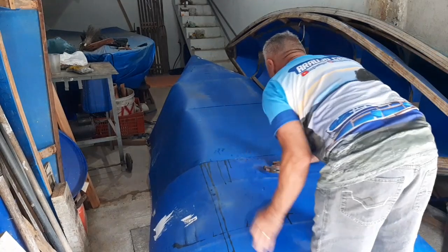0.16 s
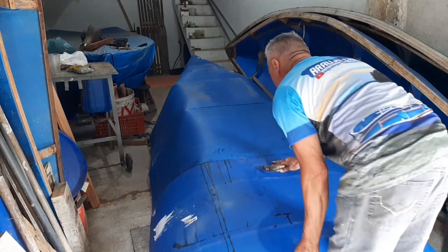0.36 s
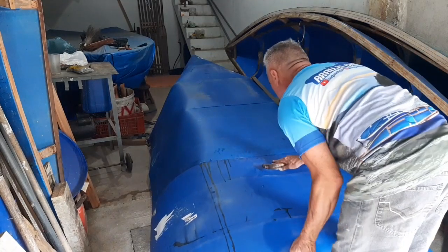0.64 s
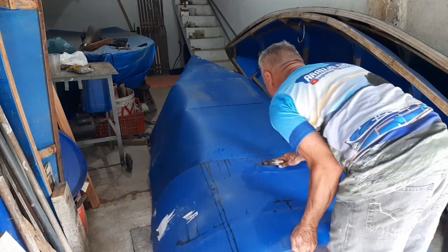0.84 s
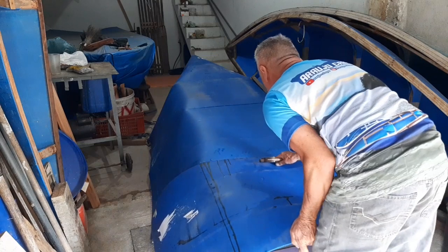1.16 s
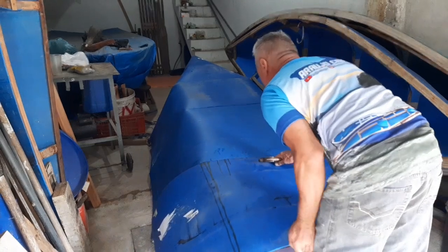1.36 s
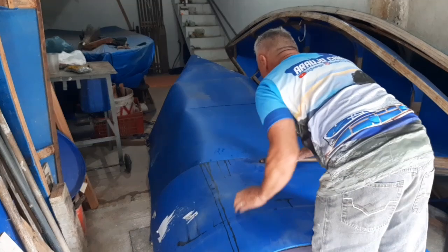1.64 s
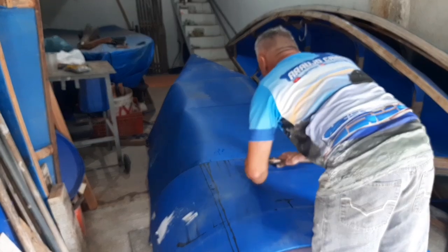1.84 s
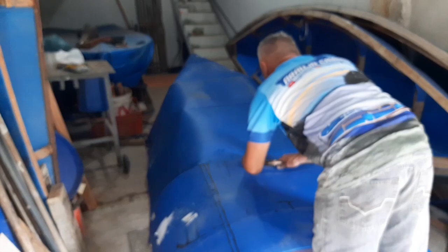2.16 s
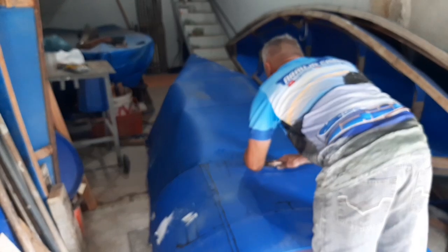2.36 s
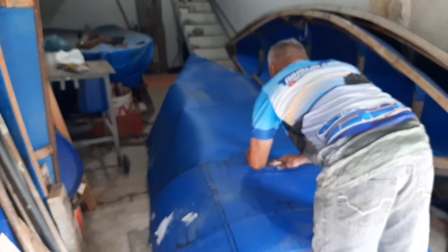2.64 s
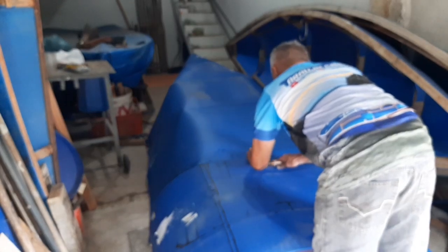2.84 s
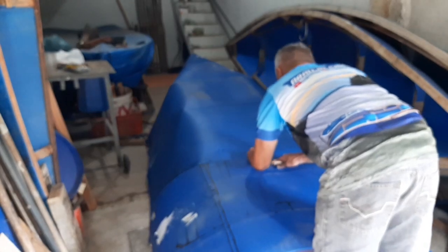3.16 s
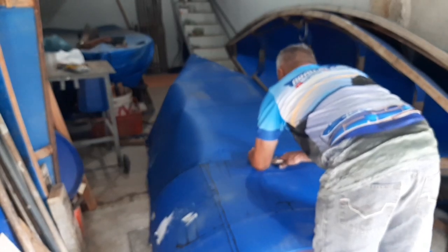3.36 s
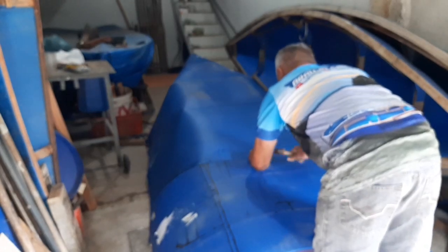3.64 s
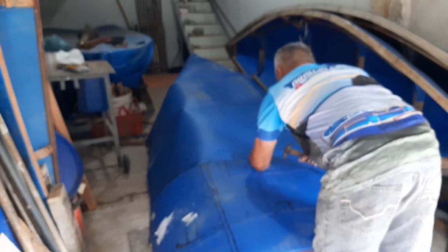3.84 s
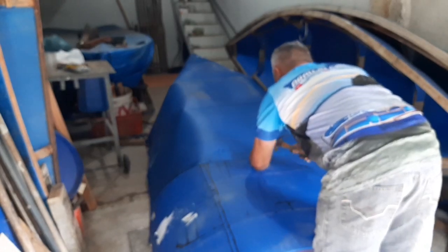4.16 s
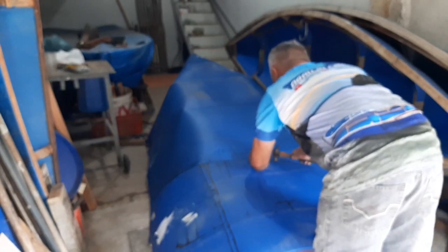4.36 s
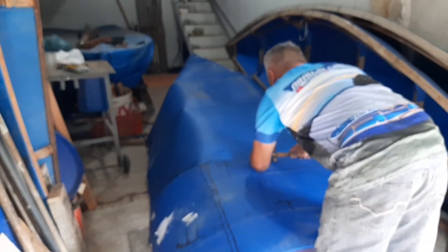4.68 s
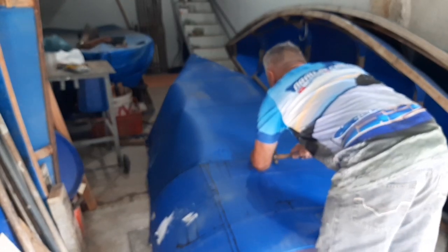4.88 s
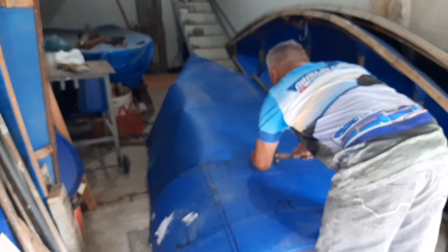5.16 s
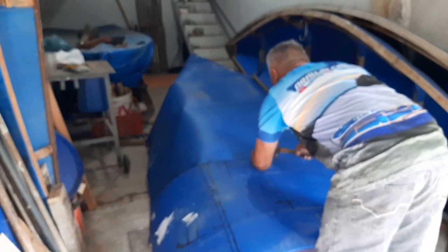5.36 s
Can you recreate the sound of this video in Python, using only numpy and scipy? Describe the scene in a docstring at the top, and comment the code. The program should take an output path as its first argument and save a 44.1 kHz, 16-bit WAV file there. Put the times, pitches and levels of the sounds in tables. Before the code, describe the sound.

Scuffs and light taps on a hollow, plastic-covered boat hull lead to three hard hammer blows, with faint birds and a distant rooster.

```python
"""Nailing plastic sheet to a boat

In a hard-walled workshop a man's hand and hammer slide and judder over an upturned wooden hull.
He taps a nail through the sheet into the frame, then strikes it three times. Each blow cracks at the
nail, rattles the sheet and booms in the hollow hull. Birds and a far rooster drift in over a low hum."""
import sys
import numpy as np
from scipy import signal
from scipy.fft import rfft, irfft, next_fast_len
from scipy.io import wavfile
from scipy.ndimage import uniform_filter1d

SR = 44100
rng = np.random.default_rng(int(sys.argv[2]) if len(sys.argv) > 2 else 0)


def master(y):
    """Save y as 16-bit WAV."""
    cut = np.clip(np.atleast_2d(y).T, -1, 1)
    pcm = np.round(cut * 32767)  # scale
    wavfile.write(sys.argv[1], SR, pcm.astype(np.int16))


N = 242991
TIME = np.arange(N) / SR
TAIL = TIME[:SR]  # one second for things to ring out
SEAT_S = .0019  # the nail bites this long after the steel touches it

# The stereo image. Each row: frequency in Hz, left-right correlation of diffuse sound,
# left minus right level in dB.
STEREO_IMAGE = [(61.1, .9, 5), (128.3, 0, 5), (269, 0.92, 3), (597, 0.7, 3), (1100, -.1, 1.4),
                (4000, 0.1, 2.5), (7930, 0.02, 2), (15600, 0.04, -2.5)]
# Tone of the background hum. Each row: frequency in Hz, relative level in dB.
HUM_TONE = [(18, -33.5), (30, -1), (93, -2), (233, -11.5), (437, -6), (740, -11.5), (937, -17.5),
            (1810, -20), (2060, -15.5), (3490, -23), (5740, -20), (14400, -32.5), (16000, -27)]
# Bird notes. Each row: start in seconds, length in seconds, opening pitch in Hz, closing pitch in Hz,
# relative level in dB, hoarseness as a share of the pitch.
BIRD_NOTES = [(1.268, 0.074, 2860, 2230, -72, 0.019), (1.336, 0.056, 2290, 2160, -65, 0.014),
              (1.536, 0.04, 2217, 2970, -67, 0.043), (1.597, 0.036, 5060, 3380, -58.5, 0.08),
              (1.857, 0.11, 2070, 1990, -72.5, 0.0046), (2.263, 0.16, 3310, 2280, -71.5, 0.019),
              (2.341, 0.242, 2318, 2240, -69.5, 0.0085), (2.507, 0.025, 6340, 6150, -64, .02),
              (2.867, 0.072, 2760, 2500, -58.5, 0.062), (3.045, .75, 4940, 4540, -66, 0.067),
              (3.079, 0.78, 3410, 3300, -65, 0.062), (3.779, 0.54, 2955, 2835, -71, 0.14),
              (4.049, 0.11, 3710, 3910, -65, 0.079), (4.1, 0.034, 4600, 3685, -57, 0.12)]
# Two rooster calls. Each row: start in seconds, length in seconds, top pitch in Hz, relative level in dB.
ROOSTER_CALLS = [(2.14, 0.523, 572.3, -63), (2.774, 0.97, 572.4, -58)]
# The rooster's timbre. Each row: harmonic number, relative level in dB.
ROOSTER_HARMONICS = [(1, -1.5), (2, -12), (3, -12.5), (4, -18.5)]
# Hand and sleeve sweeping the sheet. Each row: start in seconds, length in seconds, then mid-stroke
# hiss, sizzle and hull drag in dB, and the swell from start to end in dB.
HAND_STROKES = [(-.02, 0.04, -50, -59, -37.5, -2.5), (0.045, 0.056, -43.5, -54.5, -83, -9),
                (0.168, 0.15, -64.5, -68, -52, 6.5), (0.301, 0.26, -55, -64, -32, 0),
                (0.499, .155, -41, -51.5, -42, 8), (0.74, 0.042, -42.5, -47, -37, -2),
                (0.954, 0.092, -46, -57, -56, 8), (1.127, 0.091, -69, -75, -35, 7),
                (1.257, .07, -69, -67.5, -54, 3), (1.723, 0.046, -45.5, -52.5, -51, -7),
                (1.778, 0.13, -60, -56.5, -63, 3), (2.154, .26, -75, -77, -67, 5),
                (2.779, 0.21, -63.5, -87.5, -52.5, -6), (3.222, 0.017, -59, -63, -45.5, 3),
                (4.326, 0.067, -54, -68, -38.5, 6), (4.47, 0.12, -63.5, -72, -79, -1)]
# Tone of the rubbed plastic. Each row: frequency in Hz, relative level in dB.
HISS_TONE = [(410, -18.5), (700, -3.5), (1180, -7.5), (1350, -5), (2430, -4.5), (4060, -9), (6270, -12),
             (7570, -10.5), (10000, -29), (13000, -40), (22000, -120)]
# The hull's resonances. Each row: pitch in Hz, relative level in dB, 60 dB decay in seconds
# before the plastic shortens it.
HULL_MODES = [(65, -30.5, 1), (73.4, -34.5, 0.48), (85.67, -23, 0.96), (100.48, -21, 0.86), (102.3, -23, 1),
              (117.56, -14, 0.49), (128.9, -28, .5), (146.5, -24, 0.84), (154.5, -23.5, 0.39),
              (172.9, -23, 0.66), (206.2, -33.5, 0.55), (224.3, -21, 0.48), (272.8, -21, 0.37),
              (293.4, -26.5, 0.12), (318, -16.5, 0.17), (307, -21, 0.061), (353.7, -21, 0.48),
              (386, -24.5, 0.39), (412.2, -19.5, 0.24), (437.6, -19, 0.15), (450.4, -34, 0.62),
              (488.2, -22, 0.34), (500, -27, 0.19), (599, -34, 0.15), (634, -33.5, 0.16), (673, -32, 0.57),
              (731.7, -25.5, 0.23), (804, -28, 0.9)]
# Dense wash of hull and room. Each row: frequency in Hz, relative level in dB, 60 dB decay in seconds.
HULL_WASH = [(30.26, -11.5, 0.4), (90, -29, 0.56), (199, -5.5, 0.69), (396.7, -4, 0.49), (560, -6, 0.29),
             (1090, -13.5, 0.28), (2060, -23.5, 0.28), (5125, -25, 0.1), (16000, -49, .3)]
# Ring of nail and hammer head. Each row: pitch in Hz, relative level in dB, 60 dB decay in seconds.
STEEL_MODES = [(985, -34.5, .2), (1227, -39, .2), (3150, -34, 0.098), (4470, -36, .12), (7080, -38, 0.081)]
# Tone of steel cracking on nail and sheet. Each row: frequency in Hz, relative level in dB.
CRACK_TONE = [(100, -19.5), (500, 2), (1000, 12), (1550, 11.5), (2000, -7), (2600, -4.5), (3500, -2.5),
              (5400, -4.5), (7200, -1), (9000, -14), (12000, -3), (15500, -3)]
# Workshop tail of a crack. Each row: frequency in Hz, relative level in dB, 60 dB decay in seconds.
WALL_REVERB = [(100, -16, .5), (502, -6.5, 1), (1005, 3.5, 0.58), (1600, 3.5, 0.54), (2500, -1, 0.49),
               (4560, -4.5, 0.36), (7100, -9.5, 0.43), (9720, -15.5, 0.32), (13000, -10.5, 0.35),
               (15440, -29, 0.23)]
# The hammer head sticking and slipping on the sheet. Each row: start in seconds, push in dB,
# bass cut in Hz, knock pitch in Hz, knock level in dB.
HAMMER_SLIPS = [(0.691, -6.5, 188, 260, -17.5), (.718, 0, 235, 341, -12), (.745, 5, 343, 423, -16),
                (.780, 3, 300, 360.6, -13), (.789, -6.5, 297, 332, -1), (.821, 1.5, 171.5, 397, -7),
                (.847, -2.5, 110.1, 415, -3)]
# Hammer contacts, from grazes to full hits. Each row: start in seconds, push in dB, bass cut in Hz
# (high over a stiff rib), treble cut in Hz (low for a soft touch), crack level in dB,
# knock pitch in Hz, knock level in dB.
HAMMER_BLOWS = [(0.062, -45, 94, 880, -34, 900, -65), (0.106, -70, 86, 870, -27.5, 1080, -68),
                (0.319, -13, 59.4, 133, -39, 172, -31.5), (0.365, -18, 205, 455, -18, 387, -38),
                (0.517, -18, 90.5, 694, -20.5, 690, -33), (0.756, 2.5, 203, 494, -3.5, 370, -10.5),
                (1.0739, -4, 89.6, 590, -17, 782, -12.5), (1.728, -29, 112.7, 1555, -22.5, 825, -45),
                (2.8546, -49, 200, 1820, -26.5, 1570, -56), (2.967, -17, 92, 990, -9.5, 189.8, -27),
                (3.3731, -11.5, 185, 3180, 0.5, 1000, -17), (3.679, -40, 502, 499, -39.5, 830, -46.5),
                (4.314, -17.5, 81, 890, -18, 662, -31.5), (4.411, -17.5, 142, 750, -13, 318, -25.5),
                (4.7078, -1.5, 61.4, 3250, -1.5, 314.6, -11), (4.919, 0, 64.5, 3140, 0, 317, -5.5),
                (5.1253, -1, 59.5, 2900, -1, 321, -10.5)]


def undb(db):
    """Decibels to gain."""
    return 10 ** (np.asarray(db) / 20)


def unit(x):
    """Scale to rms 1."""
    return x / np.sqrt(np.mean(x ** 2))


def fade(t60):
    """Exponential decay, 60 dB down after t60 seconds."""
    return np.exp(-np.log(1000) * TAIL / t60)


def add(track, start_s, x):
    """Drop x onto the track at start_s."""
    start = max(int(start_s * SR), 0)
    track[start:start + len(x)] += x[:N - start]


def over_hz(rows, hz, column=1):
    """Read one column of a table on a log-frequency axis."""
    rows = np.array(rows)
    return np.interp(np.log(hz + 1e-9), np.log(rows[:, 0]), rows[:, column])


def shape(x, gain):
    """Filter by a gain that is a function of frequency."""
    size = next_fast_len(x.shape[-1] + SR // 10, True)
    hz = np.arange(size // 2 + 1) * SR / size
    return irfft(rfft(x, size) * gain(hz), size)[..., :x.shape[-1]]


def equalise(x, tone):
    """EQ through (Hz, dB) points."""
    return shape(x, lambda hz: undb(over_hz(tone, hz)))


def cut(x, hz, kind, order=2):
    """Low-pass or high-pass."""
    return signal.sosfilt(signal.butter(order, min(hz, SR / 2 - 1), kind, fs=SR, output="sos"), x)


def wobble(rate_hz):
    """Smooth random modulation of rms 1."""
    hold = max(int(SR / rate_hz), 1)
    steps = np.repeat(rng.standard_normal(N // hold + 1), hold)
    return unit(uniform_filter1d(steps, hold)[:N])


def diffuse(size):
    """Noise from all sides: mostly narrow in the lows, wide in the treble."""
    mid, side = rng.standard_normal((2, size))
    mid = shape(mid, lambda hz: np.sqrt((1 + over_hz(STEREO_IMAGE, hz)) / 2))
    side = shape(side, lambda hz: np.sqrt((1 - over_hz(STEREO_IMAGE, hz)) / 2))
    return np.array([mid + side, mid - side])


def direct(x, right_lag_s=.0004):
    """Sound straight from the hull arrives on the left first."""
    return np.array([x, np.pad(x, (round(right_lag_s * SR), 0))[:len(x)]])


def reverb(rows):
    """A diffuse tail of energy 1 whose third-octave bands die at their own rates."""
    spectrum, hz = rfft(diffuse(SR)), np.arange(SR // 2 + 1) + 1e-9
    tail = 0
    for centre in 1000 * 2 ** (np.arange(-14, 13) / 3):
        offset = np.clip(3 * np.log2(hz / centre), -1, 1)
        band = irfft(spectrum * np.cos(np.pi / 2 * offset) ** 2)
        t60 = over_hz(rows, centre, column=2)
        tail = tail + unit(band * fade(t60)) * np.sqrt(centre * t60) * undb(over_hz(rows, centre))
    return unit(tail) / np.sqrt(SR)


def excite(x, response):
    """Play a mono signal through a stereo impulse response."""
    return signal.fftconvolve(x[None], response, axes=1)[:, :N]


def neighbourhood_hum(level_db=-63.5, swell_db=1, bass_cut_hz=40):
    """The bed: quiet, dark noise from the neighbourhood, slowly breathing."""
    hum = cut(equalise(diffuse(N), HUM_TONE), bass_cut_hz, "high")
    return unit(hum) * undb(level_db + swell_db * wobble(2))


def birds():
    """Gliding sines; a fast pitch jitter turns pure whistles into hoarse chirps and buzzes."""
    calls = np.zeros(N)
    waver = wobble(900)
    for start, length, start_hz, end_hz, db, hoarse in BIRD_NOTES:
        progress = np.linspace(0, 1, int(length * SR))
        jitter = np.roll(waver, -int(start * SR))[:len(progress)]
        hz = start_hz * (end_hz / start_hz) ** progress * (1 + hoarse * jitter)
        envelope = 2 * np.sin(np.pi * progress)
        add(calls, start, undb(db) * envelope * np.sin(2 * np.pi * np.cumsum(hz) / SR))
    return calls


def rooster(rasp=0.043, sag=0.049, attack_s=.06, release_s=0.26):
    """Long hoarse notes on a shallow arch of pitch that sags at both ends."""
    calls = np.zeros(N)
    for start, length, pitch_hz, db in ROOSTER_CALLS:
        age = TIME[:int(length * SR)]
        arch = 1 - sag * (2 * age / length - 1) ** 2
        hz = pitch_hz * arch * (1 + rasp * wobble(120)[:len(age)])
        phase = 2 * np.pi * np.cumsum(hz) / SR
        voice = unit(sum(undb(level) * np.sin(k * phase) for k, level in ROOSTER_HARMONICS))
        envelope = np.clip(np.minimum(age / attack_s, (length - age) / release_s), 0, 1)
        add(calls, start, undb(db) * voice * envelope)
    return calls


def doorway(echo_t60=0.74, straight_db=-7, echo_db=-1):
    """Birds and rooster come in from outside, mostly by way of the walls."""
    calls = birds() + rooster()
    room = unit(diffuse(SR) * fade(echo_t60)) / np.sqrt(SR)
    return undb(straight_db) * np.array([calls, calls]) + undb(echo_db) * excite(calls, room)


def hand_pressure(grip_s=0.023, lift_db_per_s=198):
    """Envelopes for hiss, sizzle and drag: each stroke grips, swells or eases, and dies as it lifts."""
    gains = np.zeros((3, N))
    for start, length, hiss_db, sizzle_db, drag_db, swell_db in HAND_STROKES:
        age = TIME - start
        moving_db = swell_db * (np.clip(age / length, 0, 1) - .5)
        lift_db = lift_db_per_s * np.maximum(age - length, 0)
        pressure = np.clip(age / grip_s, 0, 1) * undb(moving_db - lift_db)
        gains += np.outer(undb([hiss_db, sizzle_db, drag_db]), pressure)
    return gains


def rubbing(hiss_gain, sizzle_gain, grain_db=0.55, grain_hz=150):
    """Skin and cloth catch on the sheet in tiny uneven grains: a hiss with a fine sizzle on top."""
    hiss = unit(equalise(diffuse(N), HISS_TONE))
    treble = cut(diffuse(N), 10000, "high", order=4)
    sizzle = unit(cut(treble, 15500, "low", order=6))
    return (hiss * hiss_gain + sizzle * sizzle_gain) * undb(grain_db * wobble(grain_hz))


def hull_boom(travel_s=.018, travel_hz=100, max_cycles=280, wash_db=12.5, wash_attack_s=0.00064):
    """The hull's response: bending waves travel faster at higher pitch, so the bass blooms last."""
    modes = 0
    for hz, db, t60 in HULL_MODES:
        lag_s = travel_s * np.sqrt(travel_hz / hz)
        bloom = 1 - np.exp(-(TAIL / lag_s) ** 2)
        decay = fade(min(t60, max_cycles / hz))  # the plastic damps long rings
        modes = modes + undb(db) * bloom * decay * np.sin(2 * np.pi * hz * (TAIL - 2 * lag_s))
    wash = undb(wash_db) * reverb(HULL_WASH) * (1 - np.exp(-TAIL / wash_attack_s))
    return direct(modes) + wash


def sheet_rattle(treble_hz, level_db=-1, t60=0.23, bass_hz=260):
    """The loose sheet chatters against the frame in a spiky burst, different each time."""
    spikes = rng.standard_normal(SR // 4) ** 3 * fade(t60)[:SR // 4]
    spikes *= undb(level_db) / np.sqrt(np.sum(spikes ** 2))
    return cut(cut(spikes, bass_hz, "high"), treble_hz, "low", order=1)


def sheet_knock(hz, cycles):
    """The patch under the hammer swells within a cycle and falls 60 dB over the given cycles."""
    turns = hz * TAIL
    attack = 1 - np.exp(-(2 * turns) ** 2)
    return -np.sin(2 * np.pi * turns) * attack * fade(cycles / hz)


def nail_bite(level_db=3, treble_hz=10500, t60=0.009):
    """The nail tears a little deeper: a burst of grit, new with every blow."""
    grit = equalise(rng.standard_normal(SR // 10), CRACK_TONE) * fade(t60)[:SR // 10]
    grit = cut(grit, treble_hz, "low")
    return undb(level_db) * grit / np.sqrt(np.sum(grit ** 2))


def nail_crack(tick_db=1, tick_hz=1700, near_t60=0.21, walls_db=1):
    """The nail's response: steel ticks and rings, then near surfaces and walls answer its bite."""
    click = cut(cut(signal.unit_impulse(SR), tick_hz, "low"), 200, "high")
    tick = -unit(click) * undb(tick_db) / np.sqrt(SR)
    ring = sum(undb(db) * fade(t60) * np.sin(2 * np.pi * hz * TAIL) for hz, db, t60 in STEEL_MODES)
    near = unit(equalise(diffuse(SR), CRACK_TONE) * fade(near_t60)) / np.sqrt(SR)
    room = near + undb(walls_db) * reverb(WALL_REVERB)
    late_room = np.pad(room, ((0, 0), (int(SEAT_S * SR), 0)))[:, :SR]
    return direct(tick + ring) + late_room


def push(bass_hz, treble_hz):
    """One contact force: a soft touch dulls it, a rib beneath thins it."""
    return cut(cut(signal.unit_impulse(SR // 10), treble_hz, "low"), bass_hz, "high")


def hammer(drag_gain, slip_hz=430, drag_hz=300, crack_reach=3.9, slip_rattle_db=-4):
    """Blows, slips and the dragging hand all shake one hull; harder contacts crack brighter."""
    force, snaps, patch = np.zeros((3, N))  # into the hull, into the nail, straight off the struck spot
    impulse = signal.unit_impulse(SR // 10)
    for start, db, bass_hz, treble_hz, crack_db, knock_hz, knock_db in HAMMER_BLOWS:
        crack_hz = crack_reach * treble_hz
        add(force, start, undb(db) * push(bass_hz, treble_hz))
        add(force, start, undb(db) * sheet_rattle(treble_hz))
        add(snaps, start, undb(crack_db) * cut(impulse, crack_hz, "low", order=1))
        add(patch, start + SEAT_S, undb(crack_db) * cut(nail_bite(), crack_hz, "low", order=1))
        add(patch, start, undb(knock_db) * sheet_knock(knock_hz, cycles=58))
    for start, db, bass_hz, knock_hz, knock_db in HAMMER_SLIPS:
        add(force, start, undb(db) * push(bass_hz, slip_hz))
        add(force, start, undb(db + slip_rattle_db) * cut(sheet_rattle(slip_hz), slip_hz, "low"))
        add(patch, start, undb(knock_db) * sheet_knock(knock_hz, cycles=11.5))
    hull = hull_boom()
    hull_gain = np.sqrt(np.sum(hull ** 2) / 2)
    drag = cut(rng.standard_normal(N), drag_hz, "low", order=1) * drag_gain / hull_gain
    return excite(force + drag, hull) + direct(patch) + excite(snaps, nail_crack())


def scene():
    """The stereo mix: hammer and hand up front, calls and hum behind."""
    hiss_gain, sizzle_gain, drag_gain = hand_pressure()
    return hammer(drag_gain) + rubbing(hiss_gain, sizzle_gain) + doorway() + neighbourhood_hum()


def record(dry):
    """Lean the bass to the left, soft-clip the loudest peaks and cut the very top."""
    top_hz = 15900
    tilted = shape(dry, lambda hz: undb(np.outer([1, -1], over_hz(STEREO_IMAGE, hz, column=2)) / 2))
    rounded = tilted / (1 + tilted ** 6) ** (1 / 6)
    return signal.sosfilt(signal.ellip(8, .2, 70, top_hz, fs=SR, output="sos"), rounded)


dry = scene()
out = record(dry)
master(out)
```